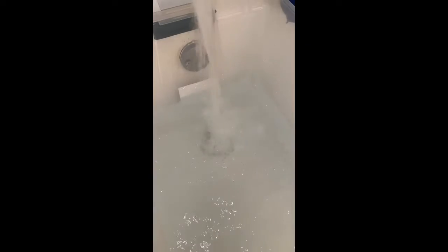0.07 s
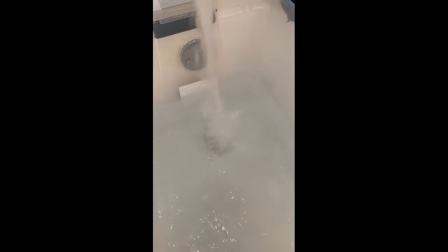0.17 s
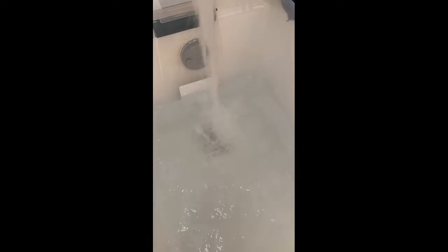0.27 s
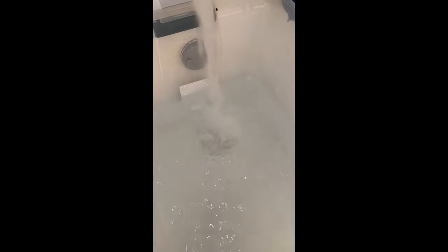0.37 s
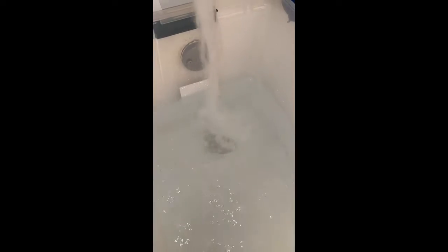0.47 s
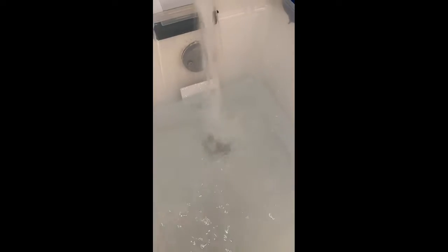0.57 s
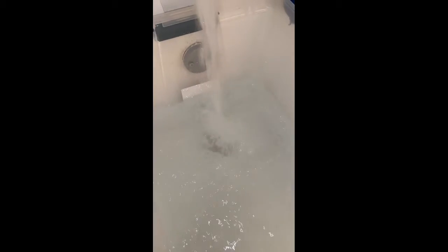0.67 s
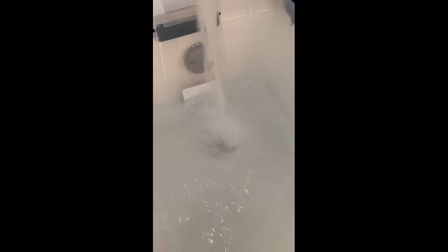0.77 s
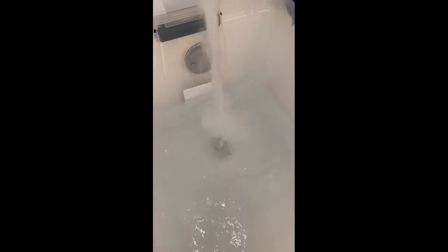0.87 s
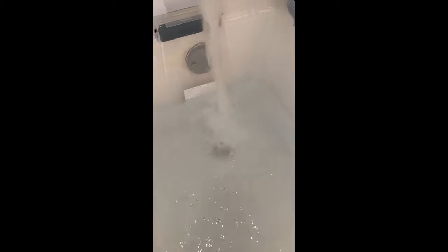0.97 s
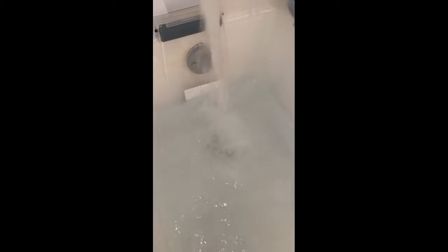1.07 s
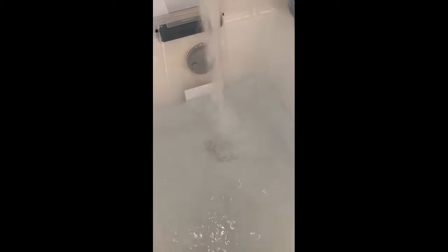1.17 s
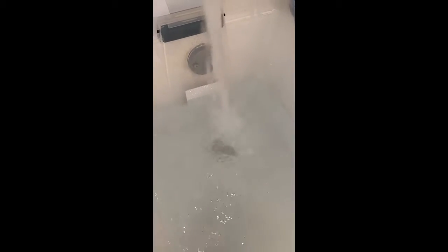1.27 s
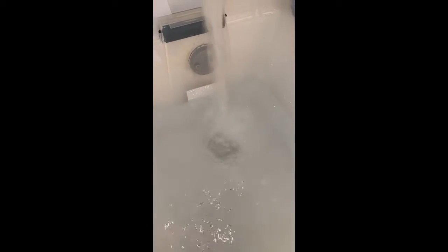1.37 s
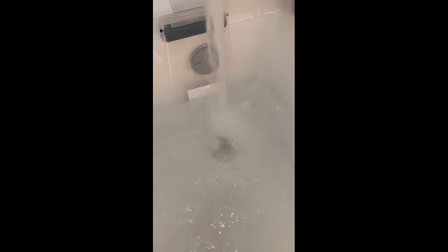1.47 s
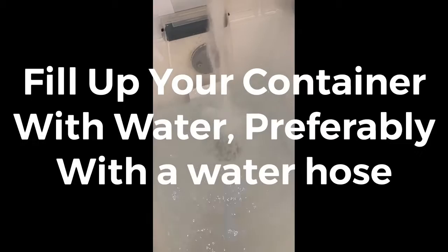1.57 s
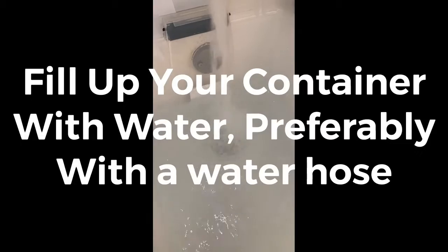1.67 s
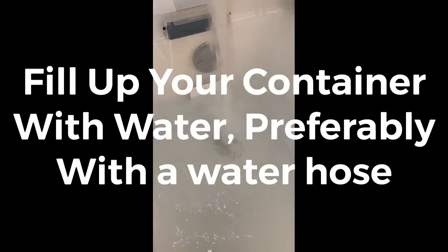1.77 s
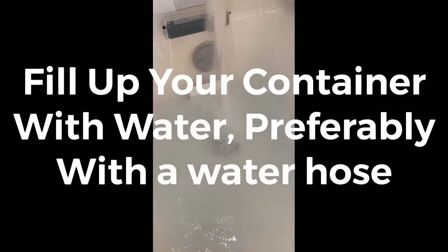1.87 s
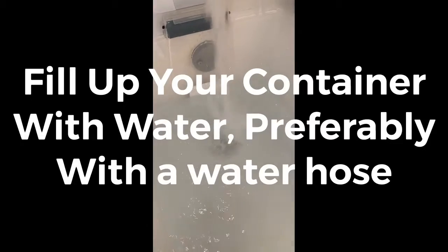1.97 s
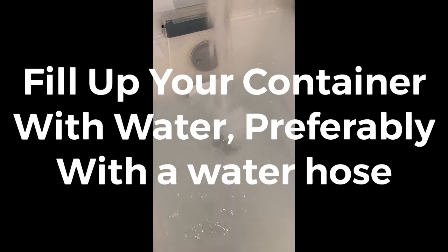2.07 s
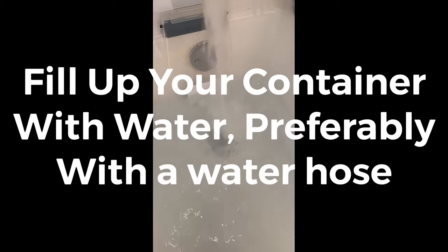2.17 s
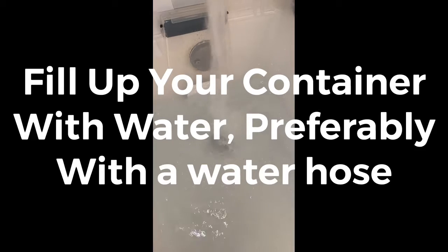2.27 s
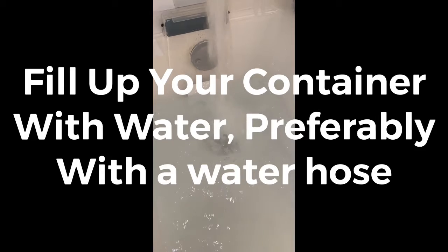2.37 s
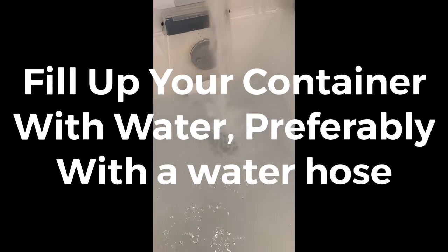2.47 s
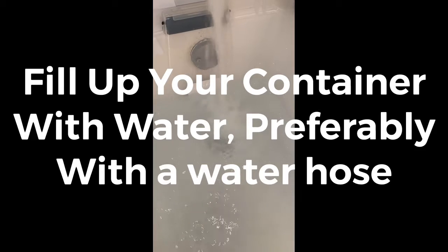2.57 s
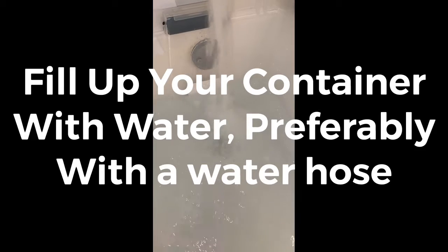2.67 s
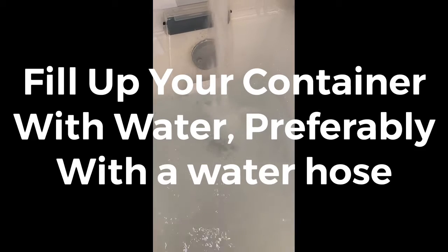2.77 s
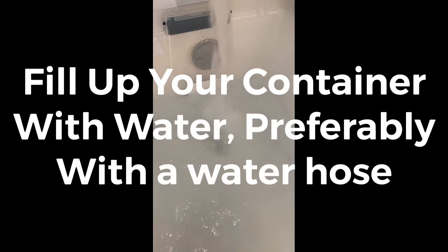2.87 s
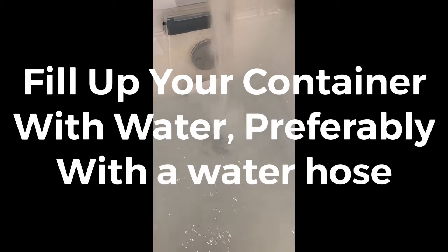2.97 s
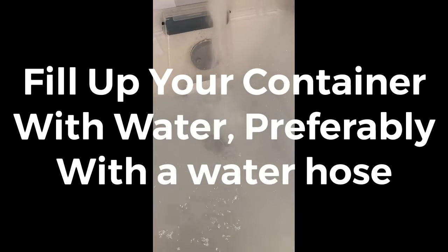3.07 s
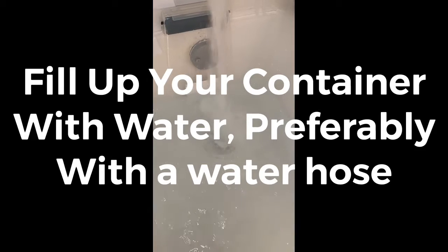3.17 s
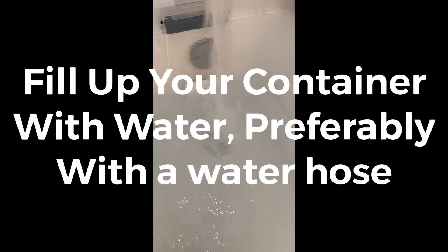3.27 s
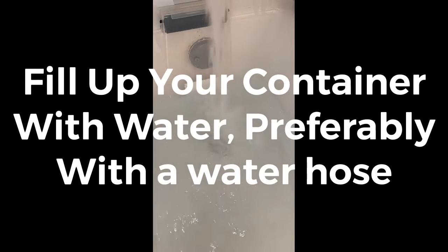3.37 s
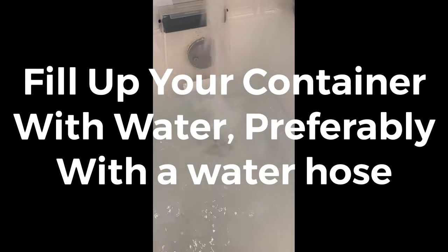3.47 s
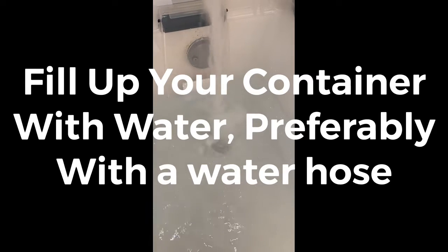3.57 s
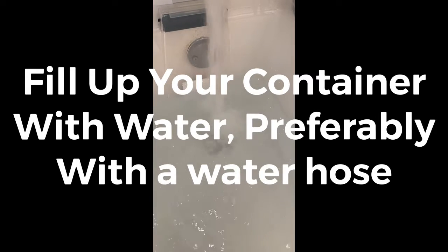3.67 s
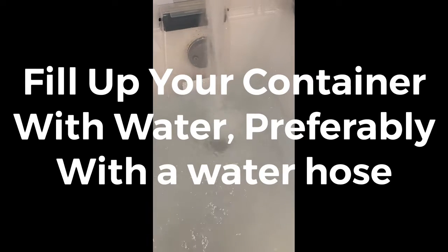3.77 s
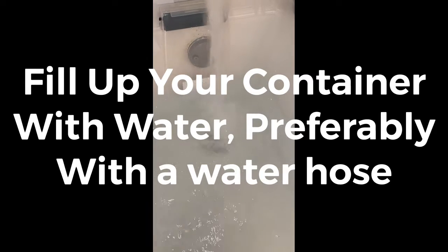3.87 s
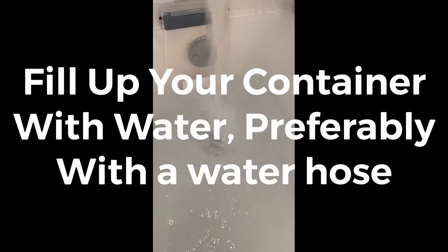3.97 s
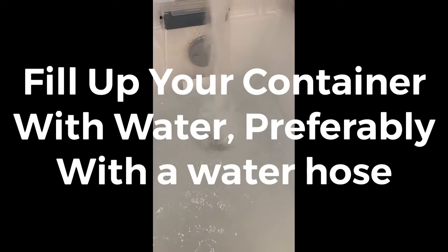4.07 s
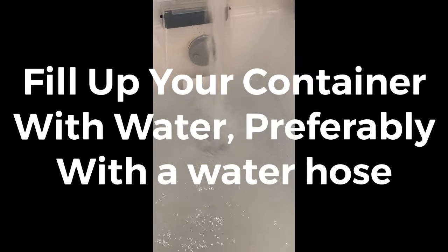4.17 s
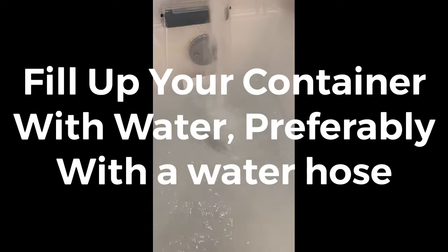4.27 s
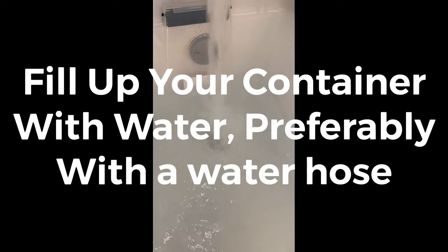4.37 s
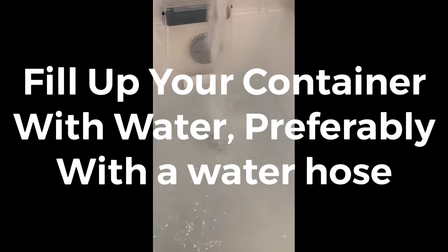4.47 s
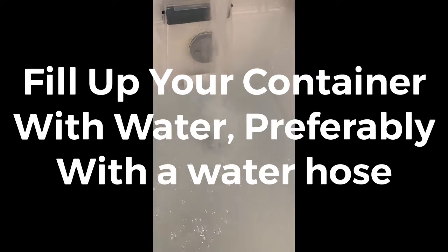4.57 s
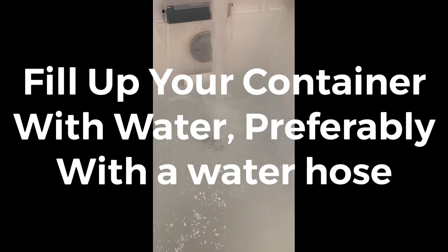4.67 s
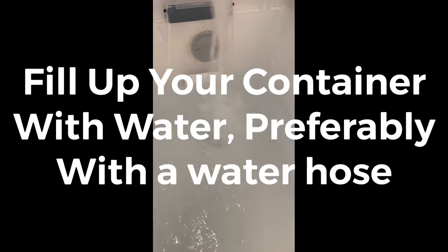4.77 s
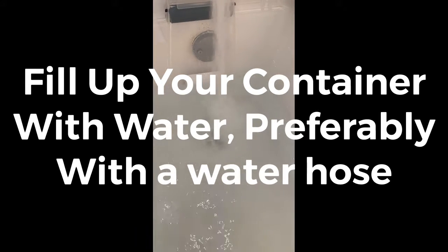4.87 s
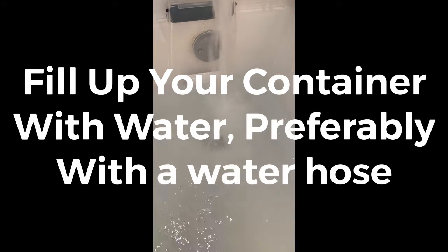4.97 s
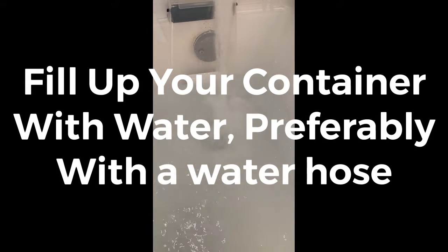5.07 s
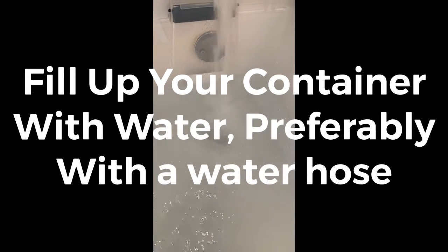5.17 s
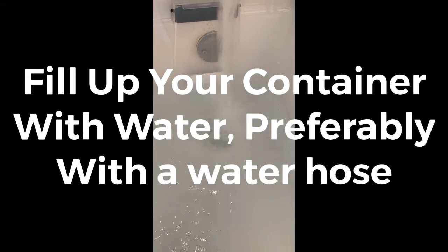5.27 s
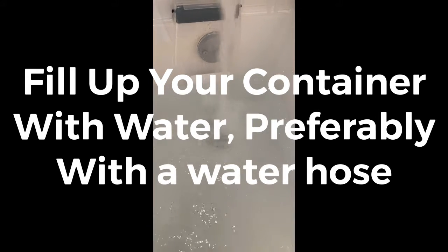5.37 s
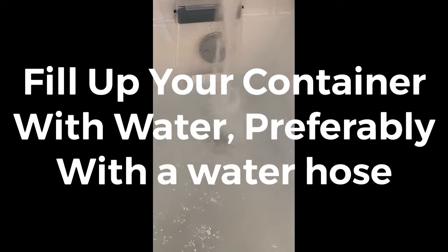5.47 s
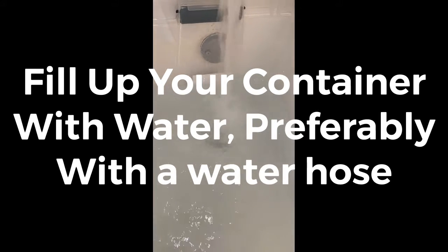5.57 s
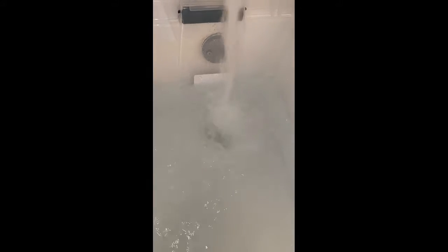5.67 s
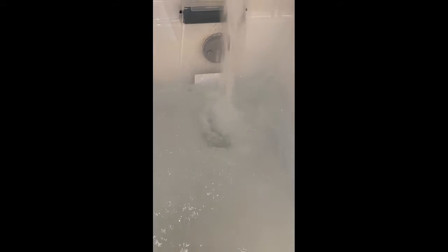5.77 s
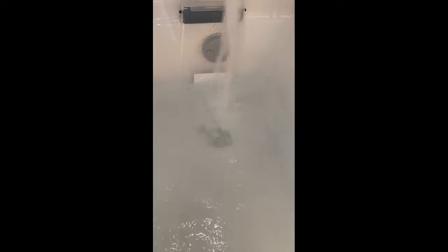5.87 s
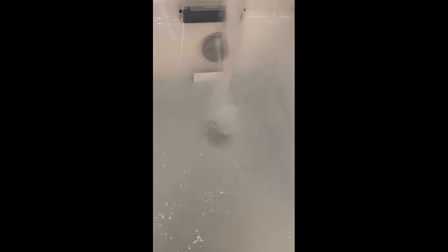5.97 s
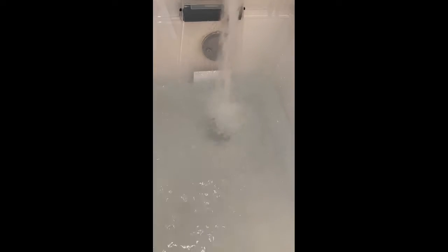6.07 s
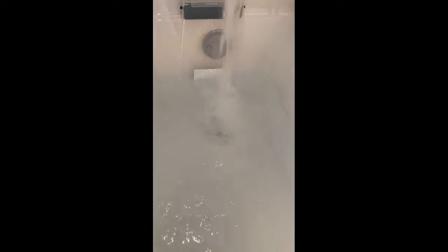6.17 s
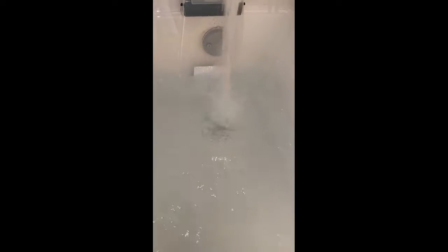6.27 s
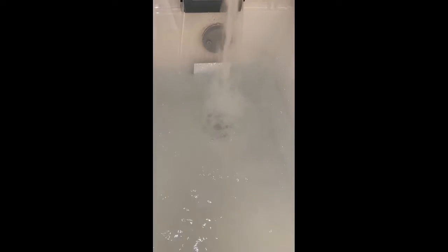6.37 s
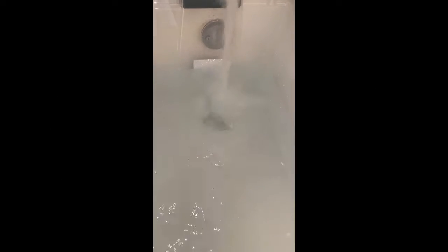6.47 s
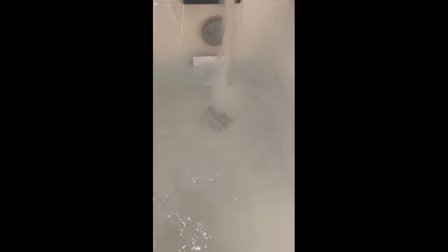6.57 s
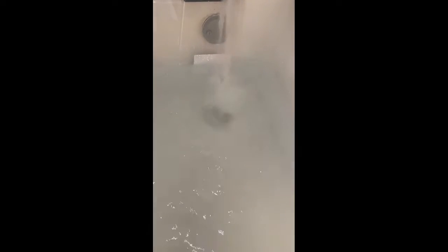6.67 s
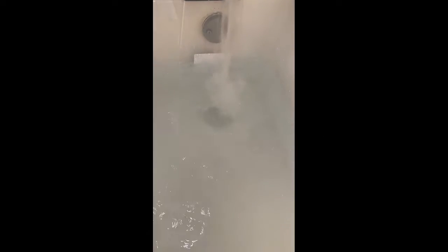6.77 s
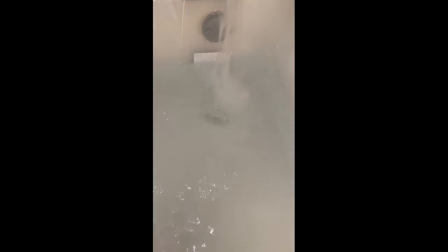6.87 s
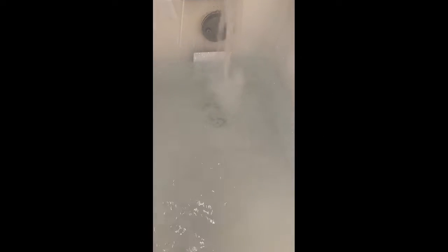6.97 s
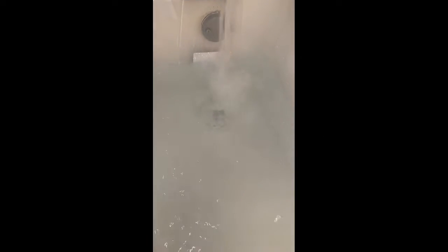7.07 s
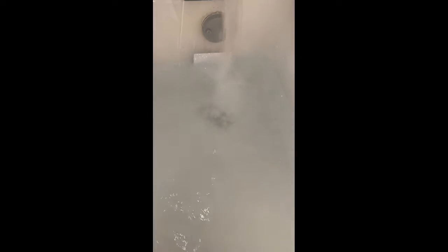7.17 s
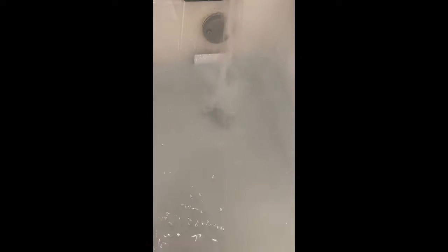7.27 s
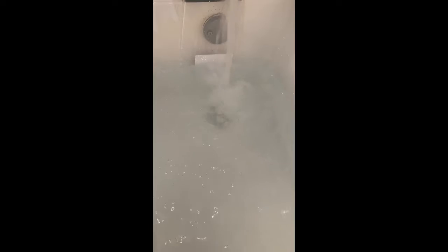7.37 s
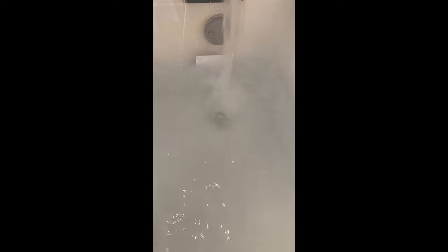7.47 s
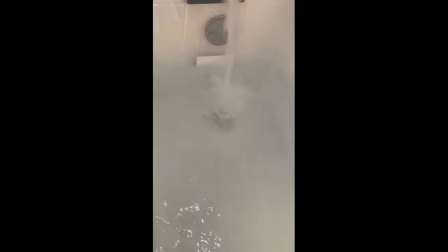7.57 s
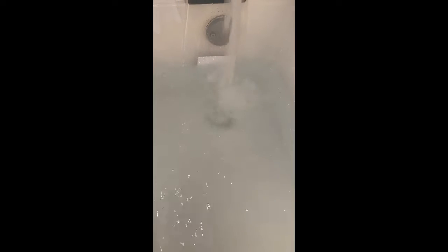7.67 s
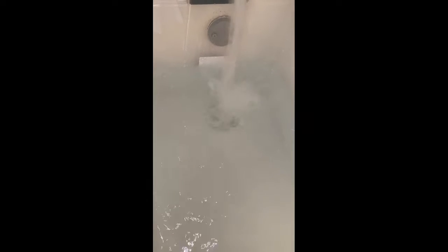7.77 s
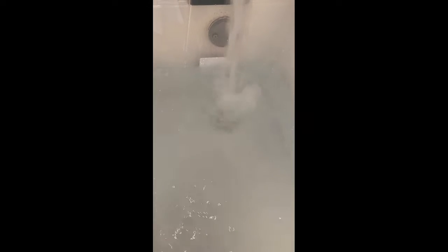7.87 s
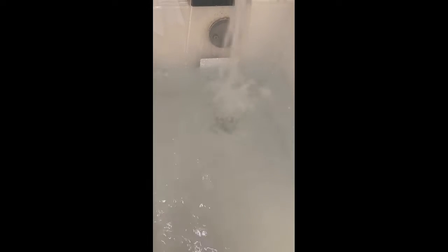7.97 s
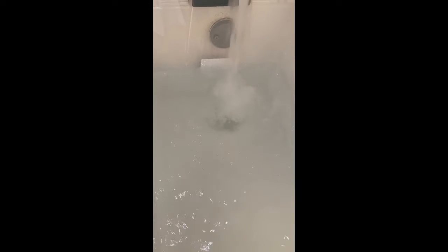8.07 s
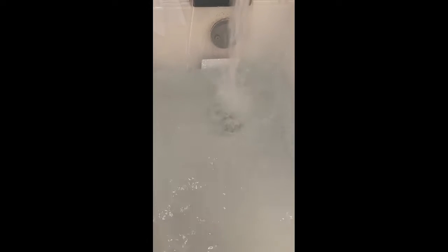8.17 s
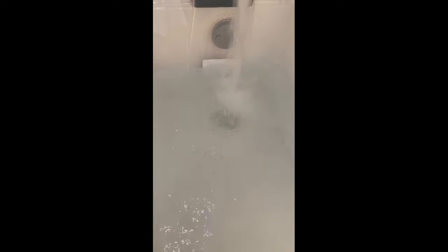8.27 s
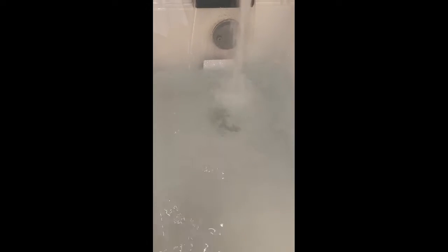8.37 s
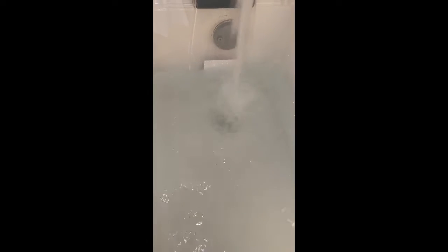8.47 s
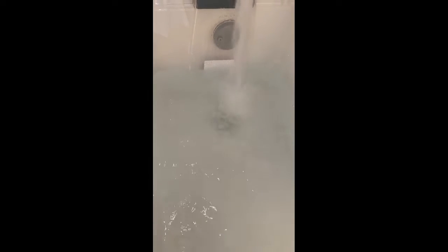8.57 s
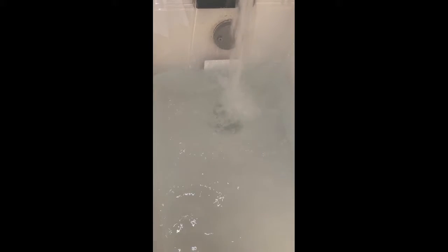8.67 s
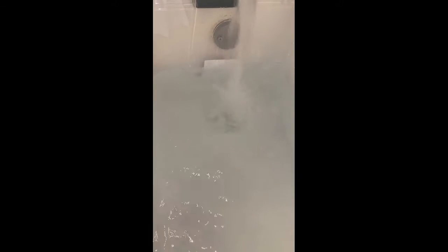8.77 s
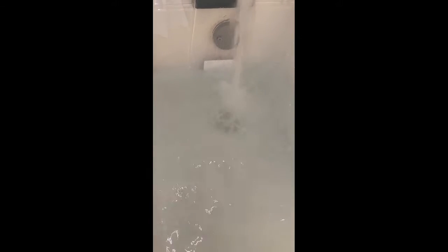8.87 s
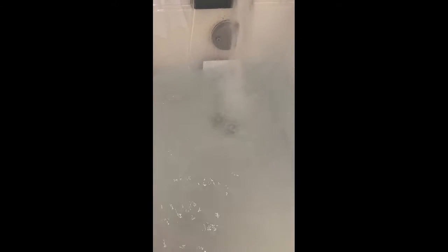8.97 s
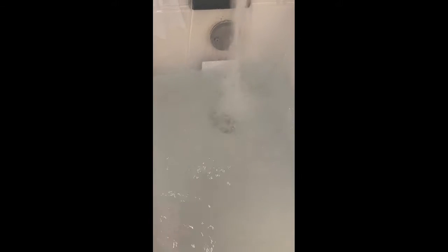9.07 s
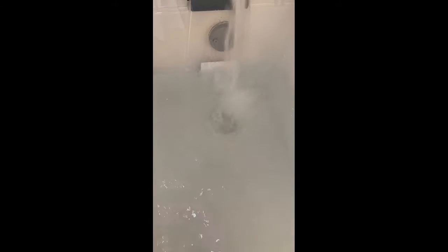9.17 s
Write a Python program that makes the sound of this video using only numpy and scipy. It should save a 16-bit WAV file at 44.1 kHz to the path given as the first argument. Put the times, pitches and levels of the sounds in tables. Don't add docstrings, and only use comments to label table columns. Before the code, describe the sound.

Continuous water stream plunging into a filling tub, fizzy and bubbling, soft at first, then swelling nearer with more plops, ticks and spray.

```python
import sys
import numpy as np
from scipy import signal
from scipy.fft import rfft, irfft, dct, next_fast_len
from scipy.io import wavfile
from scipy.ndimage import uniform_filter1d, map_coordinates

SR = 44100
rng = np.random.default_rng(int(sys.argv[2]) if len(sys.argv) > 2 else 0)


def pcm_store(signal):
    levels = np.round(np.clip(np.atleast_2d(signal), -1, 1) * 32767)
    wavfile.write(sys.argv[1], SR, levels.astype(np.int16).T)


def gain_from_decibels(decibels):
    exponent = np.asarray(decibels, float) / 20
    return 10 ** exponent


N = 406602

# time in seconds, strength in dB.
JET_STRENGTH = [(0, -40), (.7, -39.5), (1.5, -39.5), (2.3, -39), (3.2, -38.5), (3.6, -39.5), (4.05, -39.5),
                (4.2, -38.5), (4.9, -36.5), (5.5, -35.5), (6.1, -34), (6.8, -33.5), (7.2, -32.5),
                (7.9, -31), (8.5, -30.5), (9.22, -29.5)]
# start in seconds, peak level in dB, pitch in Hz.
SNAPS = [(0.496, -29, 7100), (1.432, -29, 7000), (1.588, -19, 7450), (1.615, -27, 7200), (2.083, -16, 5600),
         (2.4683, -40, 6900), (3.747, -21, 7200), (4.145, -23, 6440), (4.1833, -26, 6640),
         (4.4083, -16.5, 10500), (5.165, -29, 10500), (5.253, -20, 6310), (5.7704, -38, 6310),
         (5.8073, -20, 7400), (6.2256, -34, 6100), (6.3649, -27, 5860), (7.006, -25, 6400),
         (7.6966, -15.5, 6600), (7.7697, -13, 11200), (7.8934, -10.5, 11000), (8.119, -17, 6360),
         (8.4252, -9.5, 6450), (8.4715, -22, 6060), (8.9174, -10, 6700), (9.153, -12.5, 6440)]
# start in seconds, peak level in dB, pitch in Hz.
PLOPS = [(0.7788, -28, 1650), (1.041, -22, 2940), (3.388, -30, 2020), (4.659, -30, 2000),
         (4.6608, -18.5, 2700), (4.954, -32, 1500), (7.771, -30.5, 1900), (4.837, -24.5, 1940),
         (5.3304, -24, 1600), (5.44, -22.5, 1550), (5.487, -20.5, 2660), (5.9724, -27, 1900),
         (6.2761, -24, 2310), (6.437, -21, 1780), (6.508, -25, 1710), (7.0816, -20, 2290),
         (7.1783, -15, 1750), (7.219, -18, 1680), (7.323, -21, 2390), (7.6305, -19, 2270),
         (8.3998, -13, 2360), (8.426, -16, 3430), (8.9171, -23, 2730), (9.102, -17.5, 2330),
         (9.1596, -20, 2290), (8.8044, -35, 1750), (9.0052, -26, 1840)]
# start in seconds, peak level in dB, pitch in Hz.
HIGH_SNAPS = [(0.2433, -21, 10400), (0.2786, -29, 11000), (0.638, -26, 14800), (1.6144, -35, 12400),
              (3.206, -19, 11100), (4.145, -29, 11700), (4.1858, -19, 10500), (5.5564, -18, 11800),
              (5.633, -15, 9900), (5.885, -28, 10600), (6.227, -14, 10000), (6.762, -19, 10500),
              (6.8555, -22, 14300), (7.7707, -20, 10600), (7.8032, -31, 10400), (7.892, -22, 11200),
              (7.954, -23, 10500), (8.303, -23, 10800), (8.34, -13, 7700), (8.3848, -23, 10400),
              (8.452, -29, 7690), (8.634, -9, 8300), (8.702, -13, 10500), (8.738, -13, 10400),
              (8.8622, -9, 11600), (8.913, -15.5, 7800), (9.052, -13, 14600), (9.087, -20, 10100)]
# start in seconds, peak level in dB, pitch in Hz.
MORE_SNAPS = [(0.2764, -23, 11100), (0.6375, -27, 14800), (1.586, -29, 7310), (1.616, -23, 6730),
              (2.084, -30, 5980), (2.469, -31, 6940), (4.145, -23, 6150), (4.1839, -28, 6790),
              (4.659, -30, 7030), (5.5558, -24, 6750), (5.633, -28, 9700), (5.7698, -25, 6440),
              (5.807, -27, 7250), (5.8853, -27, 10400), (6.033, -28, 6860), (6.0826, -27, 7400),
              (6.2263, -20, 5830), (6.365, -14, 5700), (6.438, -18, 5950), (6.7594, -24, 10500),
              (6.8576, -22, 6590), (7.0055, -21, 6370), (7.0866, -19, 7150), (7.215, -19, 6340),
              (7.3222, -24, 6020), (7.3812, -17, 7430), (7.4615, -25, 6660), (7.5278, -24, 5810),
              (7.6163, -18, 5740), (7.656, -26, 6850), (7.696, -22, 6530), (7.7694, -21, 11200),
              (7.8025, -13.5, 10400), (7.892, -27, 11300), (7.953, -27, 6930), (8.0387, -24, 6960),
              (8.0721, -22, 6270), (8.1222, -20, 6520), (8.298, -19, 11700), (8.3395, -20, 7450),
              (8.3847, -20, 10300), (8.424, -30, 6500), (8.474, -20, 6060), (8.5151, -15, 6230),
              (8.5874, -28, 6310), (8.63, -13, 6030), (8.7017, -24, 10000), (8.7376, -20, 7030),
              (8.805, -20, 6040), (8.8623, -24.5, 11300), (8.912, -19, 6700), (8.9611, -12, 6600),
              (9.005, -11, 6950), (9.0875, -22, 6860), (9.155, -18, 6360)]
# start in seconds, peak level in dB, pitch in Hz.
POCKETS = [(0.014, -34, 294), (0.105, -37, 297), (0.323, -30.5, 250), (0.778, -34, 300),
           (0.932, -32.5, 233), (1.017, -40, 301), (1.167, -34, 467), (1.214, -32, 275),
           (1.378, -33.5, 193), (1.46, -34, 210), (1.738, -31.5, 277), (1.8, -37, 470), (1.904, -29, 408),
           (2.086, -37, 218), (2.196, -31, 304), (2.239, -35, 282), (2.301, -35, 203), (2.514, -29, 402),
           (2.945, -33.5, 262), (2.999, -33.5, 273), (3.067, -29, 297), (3.146, -34, 238),
           (3.219, -27.5, 379), (3.735, -32, 338), (3.805, -35.5, 442), (4.27, -32, 355), (4.491, -36, 214),
           (4.708, -35, 291), (4.836, -29, 407), (4.903, -35, 470), (4.946, -33, 278), (5.121, -35, 215),
           (5.174, -31, 422), (5.984, -28, 330), (6.21, -34, 355), (6.284, -26.5, 355), (6.505, -35, 207),
           (6.647, -31, 355), (6.682, -25, 275), (6.853, -33, 330), (7.025, -26, 355), (7.117, -24, 211),
           (7.44, -26.5, 355), (7.535, -27.5, 420), (7.932, -23, 347), (8.044, -23.5, 416),
           (8.085, -23, 400), (8.214, -20, 328), (8.272, -29, 213), (8.325, -35, 344), (8.52, -30, 356),
           (8.65, -25, 206), (8.731, -31.5, 415), (8.79, -25.5, 402), (8.859, -25, 364), (8.912, -31, 416),
           (9.047, -32, 267), (9.084, -27, 343), (9.134, -27, 311)]
# start in seconds, peak level in dB, pitch in Hz.
SINGERS = [(0.349, -41, 1084), (0.413, -42, 1701), (0.427, -46, 1460), (0.773, -47, 1723),
           (1.156, -42.5, 1740), (1.73, -40, 772), (1.881, -45, 740), (1.963, -42, 1017),
           (2.018, -39, 1700), (2.18, -43.5, 750), (2.293, -35.5, 1057), (2.314, -45, 2024),
           (2.349, -40, 1684), (2.63, -39.5, 743), (2.68, -41, 726), (2.688, -35.5, 1012),
           (3.153, -41, 2606), (3.193, -40.5, 743), (3.301, -40, 732), (3.365, -40, 1040),
           (3.379, -43, 2606), (3.382, -40, 2013), (3.466, -41, 2003), (3.71, -42, 2600),
           (3.87, -39.5, 1044), (4.134, -39, 743), (4.142, -52, 528), (4.325, -44, 2020),
           (4.645, -39, 2040), (4.906, -44, 525), (4.946, -39, 743), (4.946, -34, 1020), (5.106, -39, 754),
           (5.295, -32, 1060), (5.475, -34, 2659), (5.849, -36, 1023), (5.901, -39, 1017),
           (5.965, -37, 1880), (6.273, -38, 2315), (6.534, -37, 2272), (6.772, -36, 2350),
           (7.071, -35.5, 2310), (7.17, -36, 1733), (7.213, -33, 1066), (7.62, -38, 2283),
           (7.678, -36, 2261), (7.756, -48, 2261), (7.869, -38.5, 2046), (7.948, -37.5, 568),
           (8.392, -34, 2315), (8.508, -37, 2320), (8.63, -33, 2270), (8.686, -37, 1055),
           (8.693, -30, 1733), (8.743, -37, 2300), (8.786, -30.5, 767), (8.905, -41, 1080),
           (9.007, -31, 1723), (9.03, -32.5, 1930)]
# start in seconds, peak level in dB, pitch in Hz.
SWELLS = [(0.42, -33, 1700), (0.616, -40, 929), (0.778, -35, 1720), (1.086, -28, 1020), (2.302, -33, 1020),
          (2.638, -30, 740), (3.306, -40, 735), (3.876, -29, 1060), (4.142, -40, 738), (4.407, -28, 1010),
          (4.66, -29, 1990), (4.953, -39, 1010), (5.082, -30, 1070), (5.147, -35, 2290), (5.302, -30, 1070),
          (5.413, -18, 1060), (5.54, -28, 1010), (5.75, -33, 1060), (5.819, -27, 1010), (5.969, -29, 1890),
          (6.053, -20, 1020), (6.277, -32, 2310), (6.435, -28, 1080), (6.549, -23, 1400),
          (6.626, -24, 1070), (6.742, -25, 1030), (6.815, -31, 1070), (6.946, -24, 1340),
          (7.009, -25, 1390), (7.082, -25, 2350), (7.178, -32, 1740), (7.282, -26, 1010),
          (7.393, -21, 1070), (7.493, -33, 1060), (7.544, -28, 1890), (7.63, -32, 1020), (7.706, -27, 1010),
          (7.767, -27, 2270), (7.817, -27, 1470), (7.905, -25, 1070), (7.99, -24, 1480), (8.096, -18, 1010),
          (8.172, -32, 740), (8.243, -23, 1500), (8.322, -31, 1220), (8.399, -35, 2300), (8.526, -20, 1070),
          (8.638, -24, 2280), (8.696, -32, 1730), (8.798, -22, 738), (8.863, -29, 1060), (8.919, -30, 1080),
          (9.007, -20, 1720), (9.103, -26, 1190), (9.16, -26, 2290)]
# centre in Hz, width in Hz, level in dB, left minus right in dB.
RUMBLE_MODES = [(41, 7, -14, -1), (73.8, 14, -5, -2), (91.5, 16.5, -1, -1.5), (119.4, 6, 3, -1.5),
                (156, 15.7, -1.5, -1)]
# centre in Hz, width in Hz, level in dB, left minus right in dB.
DEEP_MODES = [(203.3, 28, -6, -2), (246, 32.6, -2, -1.5), (273.4, 10.8, -6, 1.5), (295.7, 13, -5.5, -3),
              (355, 16, 0, -2.5), (415, 28, 1.5, -3.5), (428.7, 27, 0.5, -1.5), (512.3, 25, -13, -12)]
# centre in Hz, width in Hz, level in dB, left minus right in dB, gain when near in dB.
WALL_MODES = [(586, 30, -8, -12, 0.5), (743, 28, -2.5, -3, 0), (844, 35, -9, -4, 1),
              (1012, 24, 0.5, -2, -2), (1067.5, 45, -5, -5.5, 4), (1207, 22, -5.5, 7.5, -3),
              (1389, 20, -8, -13, 0), (1498, 22, -5.5, -1, -1), (1711, 32, -1.5, -6, -3.5),
              (1891, 30, -8.5, -1, 3.5), (2018, 40, -5.5, -6, -4.5), (2290, 75, -11.5, -10, 6),
              (2640, 70, -5.5, -9.5, -2.5), (3458, 160, -17, 5, 8)]
# frequency in Hz, density in dB per Hz.
SPLASH_COLOUR = [(25, -60), (45, -2), (200, -7), (480, 1), (660, -7), (950, -1.5), (1500, 2), (2200, -5.5),
                 (3500, 0), (7500, -3.5), (8700, -2.5), (10000, -2), (11000, -4), (14000, -3.5),
                 (16000, -4.5)]
# frequency in Hz, phase in half turns.
PORT_LEAD = [(0, 0), (2000, .13), (3200, .43), (4200, .83), (4690, 1), (6720, 2), (8900, 3), (11000, 4),
             (13200, 5), (15300, 6)]
# frequency in Hz, coherence from 0 to 1.
PORT_LIKENESS = [(150, .98), (600, .55), (2200, .4), (3300, .7), (4300, .89), (6700, .89), (9000, .88),
                 (15000, .88)]
NEARING_S = (4.4, 5.8)
# frequency in Hz, margin in dB.
MARGIN = [(1200, 24), (1800, 13), (3920, 18), (4220, 8.2), (4440, 8.6), (4650, 7.8), (4910, 7), (5170, 7.5),
          (5400, 10), (6800, 7), (9000, 8.4), (11000, 6), (12600, 4.8), (13400, 6), (15000, 4.5)]
# frequency in Hz, signal over step in dB.
COARSE = [(200, 21), (700, 14), (1200, 6), (1800, .5), (2500, -3), (3300, -2.5), (5500, -1), (15000, -1)]
WHOLE_S = [.25, .28, 1.62, 2.62, 2.95, 3.02, 3.375, 3.46, 3.85, 4.13, 5.57, 6.225, 6.87, 7.775, 8.31]
BAND_EDGES = [*range(0, 196, 14), 196, 206, 216, 228, 240, 252, 264, 278, 292, 306, *range(320, 1024, 16)]

TOP_HZ = 15780
BLOCK, START = 1024, 840
SPRAY_DB, MIST_DB, PLUNGE_DB, GURGLE_DB = -6, -0.5, -8, -6.5
PLUNGE_SWING_DB, GURGLE_SWING_DB, SPRAY_SWING_DB, MIST_SWING_DB = 1.03, 0.16, 0.09, 1.16
STIR_DB = 9
GULP_S, GULP_PLUNGE, GULP_GURGLE = 0.07, 0.21, 0.12
SCATTER_S, SCATTER_SPRAY = 0.047, 0.075
SWELL_S, SWELL_GURGLE = .05, .22
SING_S, SING_RISE = .045, .02


def unit(x):
    return x / np.sqrt(np.mean(x ** 2) + 1e-20)


def along(points, hz):
    f, v = np.transpose(points)
    return np.interp(np.log(hz + 1), np.log(f + 1), v)


def wobble(rate):
    knots = rng.standard_normal(int(N * rate / SR) + 9)
    return map_coordinates(knots, [np.arange(N) * rate / SR])


def filtered(x, response):
    m = next_fast_len(N + 8192)
    return irfft(rfft(x, m) * response(np.fft.rfftfreq(m, 1 / SR)), m)[..., :N]


def lag(pair):
    f, turns = np.transpose(PORT_LEAD)
    side = np.array([[.5j], [-.5j]])
    return filtered(pair, lambda hz: np.exp(side * np.interp(hz, f, turns) * np.pi))


def ports(pair):
    def mix(hz):
        turn = np.arccos(np.clip(along(PORT_LIKENESS, hz), 0, 1)) / 2
        return np.array([np.cos(turn), np.sin(turn)])
    shared, apart = filtered(pair, mix)
    return lag(np.array([shared + apart, shared - apart]))


def ring(modes):
    side = np.array([[.5], [-.5]])

    def response(f):
        total = 0
        for k, (centre, width, db, pan_db) in enumerate(modes):
            damping = 1j * f * width
            total = total + (-1) ** k * gain_from_decibels(db + side * pan_db) * damping / (centre ** 2 - f * f + damping)
        return total
    return response


def patchy(patchy_db, tall, long):
    z = signal.stft(rng.standard_normal((2, N)), nperseg=256)[2]
    field = uniform_filter1d(rng.standard_normal(z.shape[1:]), tall, 0)
    field = unit(uniform_filter1d(field, long, 1))
    return unit(signal.istft(z * gain_from_decibels(patchy_db * field), nperseg=256)[1][:, :N])


def bubbles(start_s, db, hz, cycles, rise, size, sharp=25):
    t = np.arange(size) / SR
    age = t * hz[:, None] / cycles
    tone = np.sin(2 * np.pi * hz[:, None] * t * (1 + rise * np.minimum(age, 2) / 2))
    tone *= gain_from_decibels(db)[:, None] * np.exp(-3 * age) * (1 - np.exp(-sharp * age))
    at = (start_s * SR).astype(int)[:, None] + np.arange(size)
    return np.bincount(at.ravel(), tone.ravel(), N + size)[:N]


def swarm(count, hz, spread, cycles, scatter_db, size):
    when, pick, big = rng.random(count), rng.standard_normal(count), rng.exponential(size=count)
    pitch = np.clip(hz * np.exp(spread * pick), 60, 15000)
    return unit(bubbles(when * N / SR, scatter_db * np.minimum(big, 3.8), pitch, cycles, .2, size))


def stir(events, strength_db, length_s):
    s, db, _ = np.transpose(events)
    at = (s * SR).astype(int)
    over = np.bincount(at, np.maximum(db - strength_db[at], 0), N)
    hump = np.sin(np.pi * np.clip(np.arange(SR // 4) / SR / length_s, 0, 1)) ** 2
    return signal.fftconvolve(over, hump)[round(length_s * SR / 4):][:N]


def bursts():
    swing = wobble(34)
    return unit(swing - uniform_filter1d(swing, size=SR // 12))


def slaps():
    when, big = rng.random((2, round(70 * N / SR)))
    blows = np.bincount((when * N).astype(int), -np.log(big + .02), N)
    lift = signal.fftconvolve(blows, gain_from_decibels(-20 * np.arange(SR // 8) / SR / .022))[:N]
    return unit(lift - uniform_filter1d(lift, size=SR // 6))


def drops():
    s, db, hz = np.transpose(SNAPS + PLOPS + HIGH_SNAPS + MORE_SNAPS)
    blows = np.bincount((s * SR).astype(int), gain_from_decibels(db - 10.5), N)
    puff = signal.fftconvolve(blows, gain_from_decibels(-60 * np.arange(900) / SR / 0.026))[:N]
    crack = puff * filtered(rng.standard_normal((2, N)), lambda f: gain_from_decibels(along(SPLASH_COLOUR, f)))
    crack[0] += bubbles(s, db - 5.5, hz, 13, 0.066, size=512, sharp=18)
    for _ in range(2):
        late, off = rng.standard_normal((2, len(s)))
        stray_hz = np.minimum(hz * np.exp(0.39 * off + 0.14), 15000)
        crack[0] += bubbles(s + 0.0014 * abs(late), db - 9.0, stray_hz, 8, 0.041, size=256)
    return ports(crack)


def pockets():
    s, db, hz = np.transpose(POCKETS)
    gulp = bubbles(s, db + 0.4, hz, 17.0, 0.076, size=3072, sharp=5.1)
    s, db, hz = np.transpose(SINGERS)
    song = bubbles(s + .005, db + 6.5, hz, SING_S * hz[:, None], SING_RISE, size=3072, sharp=6.1)
    return lag(gulp * gain_from_decibels([[.8], [-.8]]) + song * gain_from_decibels([[1.6], [-1.6]]))


def rumble(churn, calm_db):
    common = gain_from_decibels(calm_db - 5.5) * unit(filtered(churn[1], ring(RUMBLE_MODES)))
    differing = gain_from_decibels(calm_db - 35) * unit(filtered(churn[0], ring(RUMBLE_MODES[:2])))
    return common + differing * [[1], [-1]]


def plunge(churn, level_db):
    big = swarm(count=900, hz=330.0, spread=.25, cycles=7.65, scatter_db=1.0, size=1536)
    return gain_from_decibels(level_db) * unit(filtered(churn[0] + 0.12 * big, ring(DEEP_MODES)))


def walls(churn):
    middling = swarm(count=4000, hz=1600.7, spread=.35, cycles=14, scatter_db=2.0, size=640)
    drive = churn[1] + .3 * middling
    near = np.interp(np.arange(N) / SR, NEARING_S, [0, 1])
    far = filtered(drive, ring([mode[:4] for mode in WALL_MODES]))
    near_modes = [(hz, w, db + gain_db, pan) for hz, w, db, pan, gain_db in WALL_MODES]
    close = filtered(drive, ring(near_modes))
    return unit(far + near * (close - far))


def surface_hiss():
    hiss = patchy(1.6, 5, 5)
    hiss[0] += .5 * swarm(count=12000, hz=10500, spread=.33, cycles=9, scatter_db=5, size=128)
    hiss[0] += 0.25 * swarm(count=1800, hz=2698, spread=.35, cycles=30, scatter_db=2.5, size=320)
    hiss[0] += 0.2 * swarm(count=1800, hz=6260, spread=.45, cycles=45, scatter_db=2.0, size=512)
    return unit(filtered(hiss, lambda hz: gain_from_decibels(along(SPLASH_COLOUR, hz))))


def splash(spray_gain, gurgle_gain):
    hiss = surface_hiss()
    body = filtered(hiss, lambda hz: 1 / (1 + (hz / 3300) ** 4))
    mist = filtered(hiss, lambda hz: 1 / (1 + (9300 / (hz + 1)) ** 8))
    fizz = hiss - body - mist + gain_from_decibels(MIST_DB - 2.0 + MIST_SWING_DB * bursts()) * mist
    return gain_from_decibels(0.87 * slaps()) * (spray_gain * fizz + gain_from_decibels(4.5) * gurgle_gain * body)


def jet():
    strength_db = np.interp(np.arange(N) / SR, *np.transpose(JET_STRENGTH))
    burst = bursts()
    surge, flutter = wobble(30), wobble(70)

    calm_db = strength_db + PLUNGE_DB
    plunge_db = calm_db + PLUNGE_SWING_DB * burst + .5 * surge
    plunge_db += GULP_PLUNGE * stir(POCKETS, strength_db - STIR_DB, GULP_S)

    gurgle_db = strength_db + GURGLE_DB + GURGLE_SWING_DB * (0.5 * burst + 1.0 * bursts())
    gurgle_db += GULP_GURGLE * stir(SINGERS, strength_db - STIR_DB, GULP_S)
    gurgle_db += SWELL_GURGLE * stir(SWELLS, strength_db, SWELL_S) + 0.26 * surge

    spray_db = strength_db + SPRAY_DB + SPRAY_SWING_DB * (0.77 * burst + 1.3 * bursts())
    spray_db += SCATTER_SPRAY * stir(SNAPS + MORE_SNAPS, strength_db, SCATTER_S)
    spray_db += 7.5 + 0.42 * surge + 0.64 * flutter

    churn = patchy(0.9, 3, 8)
    gurgle_gain = gain_from_decibels(gurgle_db)
    shell = gain_from_decibels(-1.0) * gurgle_gain * walls(churn)
    tub = rumble(churn, calm_db) + plunge(churn, plunge_db) + shell
    return lag(tub) + ports(splash(gain_from_decibels(spray_db), gurgle_gain))


def scene():
    return jet() + drops() + pockets()


def squeeze(pair, ragged_db, limit):
    window = signal.windows.kaiser_bessel_derived(2 * BLOCK, 4 * np.pi)
    lead = 2 * BLOCK - START
    tail = 3 * BLOCK - (lead + N) % BLOCK
    halves = np.pad(pair, ((0, 0), (lead, tail))).reshape(2, -1, BLOCK)
    a, b, c, d = np.split(np.dstack([halves[:, :-1], halves[:, 1:]]) * window, 4, axis=2)
    lines = dct(np.dstack([-c[..., ::-1] - d, a - b[..., ::-1]]), type=4, norm="ortho")
    hz, width = np.arange(BLOCK) * SR / 2 / BLOCK, np.diff(BAND_EDGES + [BLOCK])
    edge_hz = hz[BAND_EDGES]
    power = np.add.reduceat(lines ** 2, BAND_EDGES, 2) / width
    power = uniform_filter1d(power, size=3, axis=2)

    ragged = np.minimum(rng.standard_normal(power.shape[1:]), 1.7)
    margin_db = along(MARGIN, edge_hz) + ragged_db * ragged
    whole = ((np.array(WHOLE_S) * SR + lead) / BLOCK - .9).astype(int)
    spared = rng.random((len(WHOLE_S), len(BAND_EDGES))) < .85
    margin_db[whole] += np.where(edge_hz < 6000, 20, 3) * spared
    steady = uniform_filter1d(power, size=3, axis=1)
    weak = steady * gain_from_decibels(2 * margin_db) < steady[::-1]
    lines = lines * ~weak.repeat(width, 2)

    luck = rng.standard_normal(lines.shape[1] + 1)
    fed = (luck[1:] + .6 * luck[:-1] < limit)[:, None]
    step = np.sqrt(power.max(0)).repeat(width, 1) * gain_from_decibels(-along(COARSE, hz) - 2.5 * fed) + 1e-9
    step[whole] *= gain_from_decibels(-5)
    coarse = np.sign(lines) * step * np.floor((abs(lines) / step) ** .75 + .4054) ** (4 / 3)
    blur = np.round(3.6 * rng.standard_normal(lines.shape))
    coarse += .03 * step * fed * (lines != 0) * blur
    coarse *= hz < TOP_HZ

    p, q = np.split(dct(coarse, type=4, norm="ortho"), 2, axis=2)
    unfolded = np.dstack([q, -q[..., ::-1], -p[..., ::-1], -p]) * window
    first, second = np.split(unfolded, 2, axis=2)
    return (second[:, :-1] + first[:, 1:]).reshape(2, -1)[:, lead - BLOCK:][:, :N]


def roll_off(x):
    return signal.sosfilt(signal.butter(12, 17050, fs=SR, output="sos"), x)


def record(dry):
    left, right = filtered(dry, lambda hz: hz < TOP_HZ) / 2
    mid, side = squeeze(np.array([left + right, left - right]), ragged_db=1.3, limit=.3)
    return roll_off(np.array([mid + side, mid - side]))


dry = scene()
out = record(dry)
pcm_store(out)
```